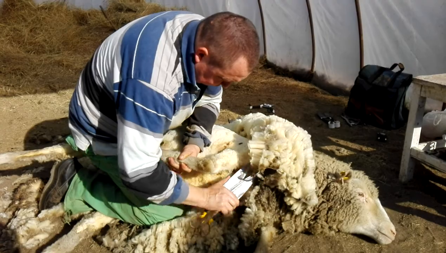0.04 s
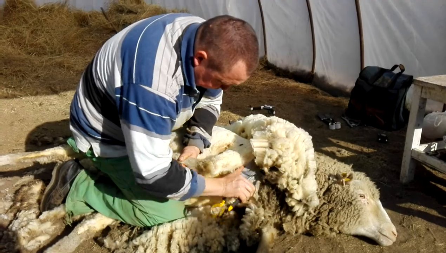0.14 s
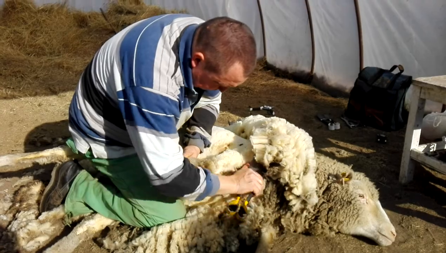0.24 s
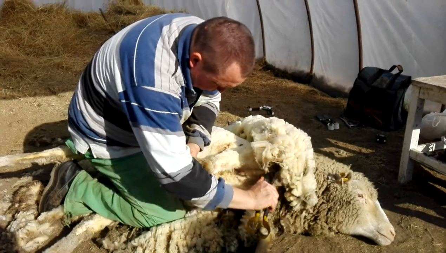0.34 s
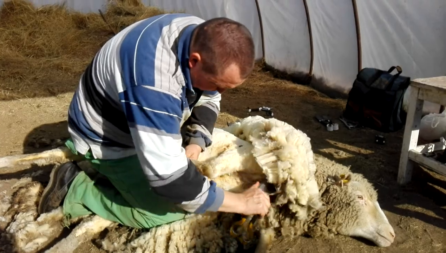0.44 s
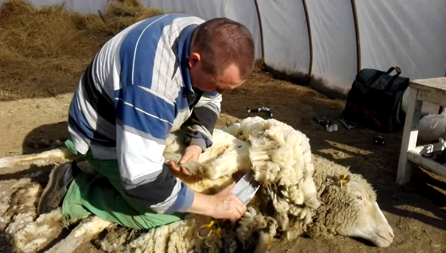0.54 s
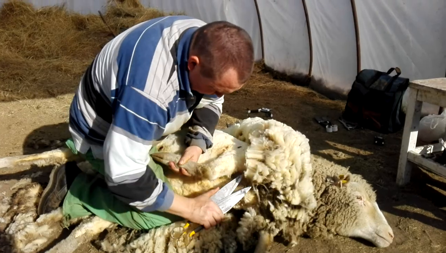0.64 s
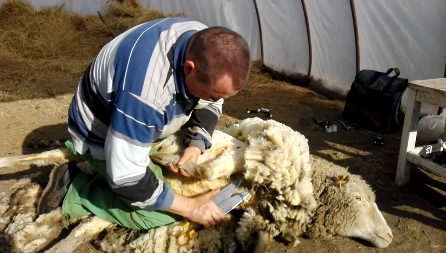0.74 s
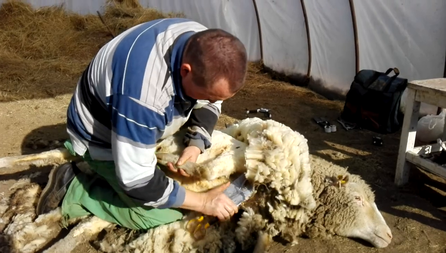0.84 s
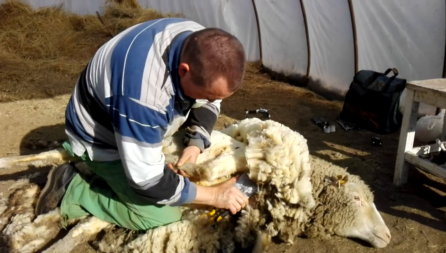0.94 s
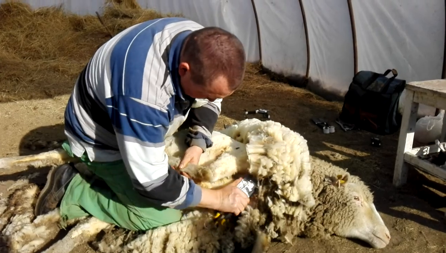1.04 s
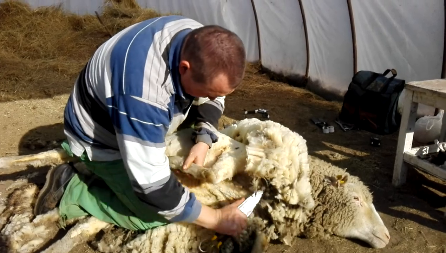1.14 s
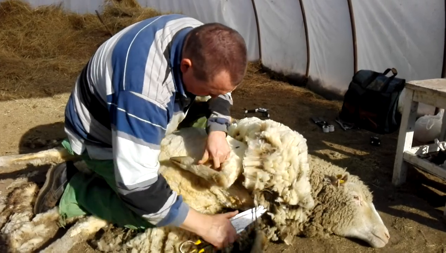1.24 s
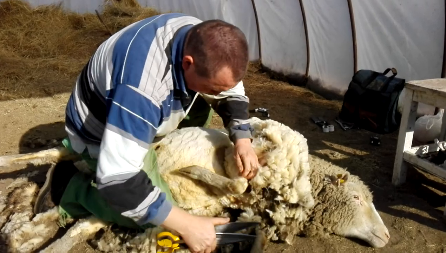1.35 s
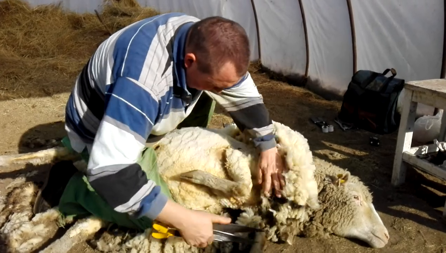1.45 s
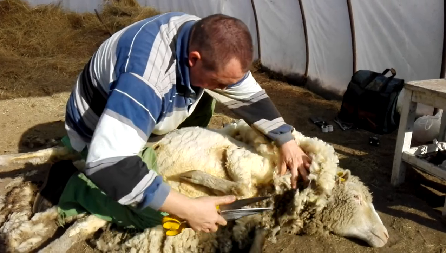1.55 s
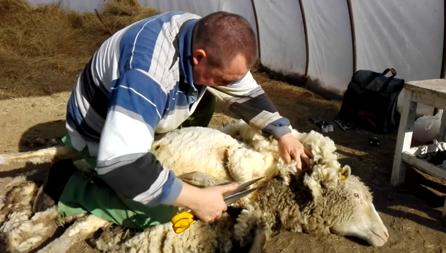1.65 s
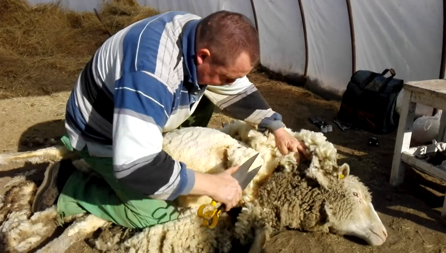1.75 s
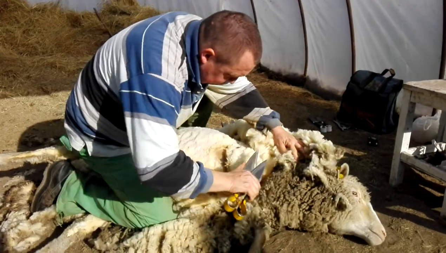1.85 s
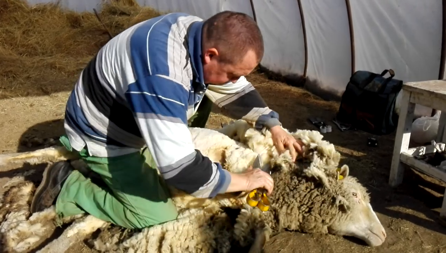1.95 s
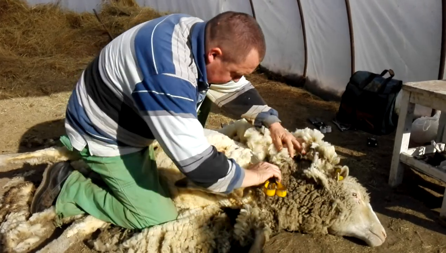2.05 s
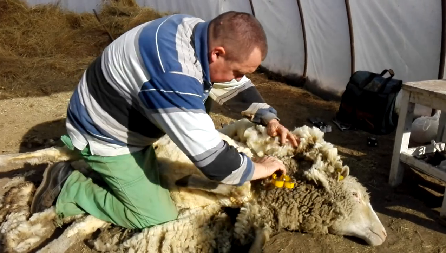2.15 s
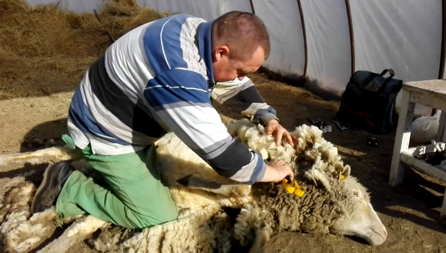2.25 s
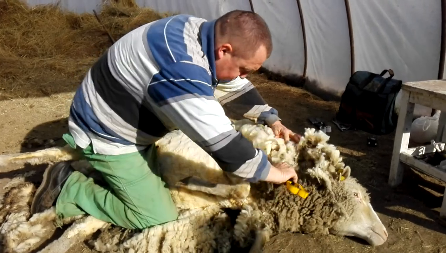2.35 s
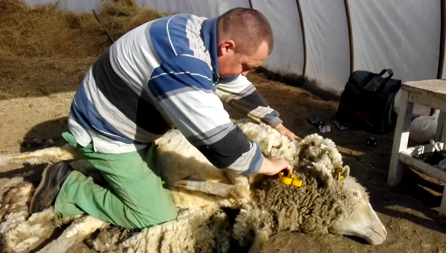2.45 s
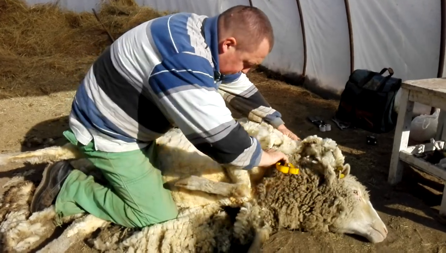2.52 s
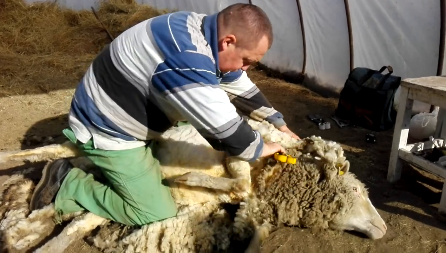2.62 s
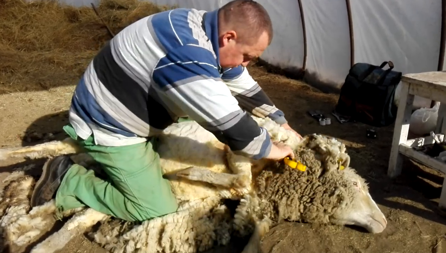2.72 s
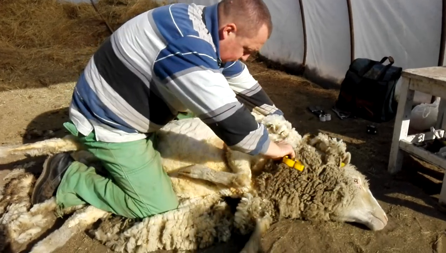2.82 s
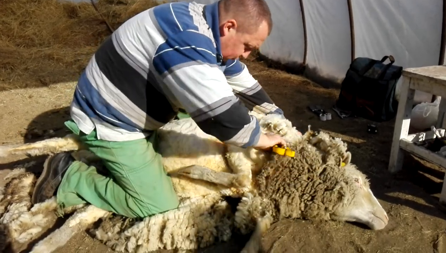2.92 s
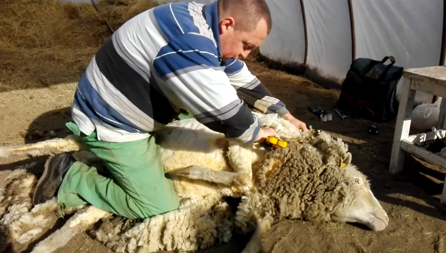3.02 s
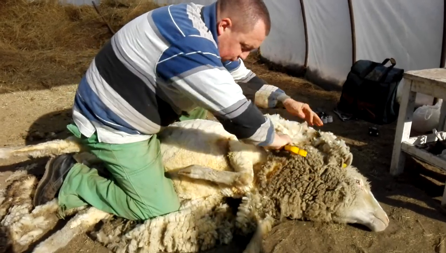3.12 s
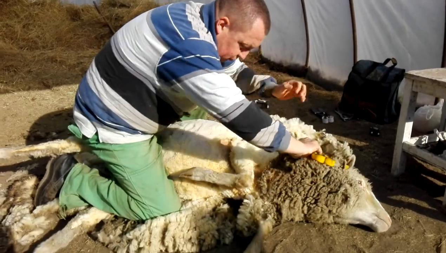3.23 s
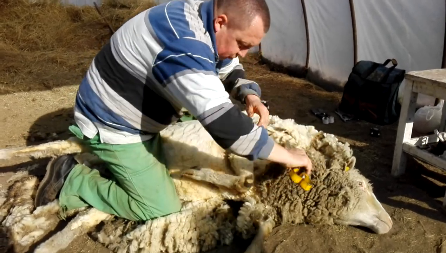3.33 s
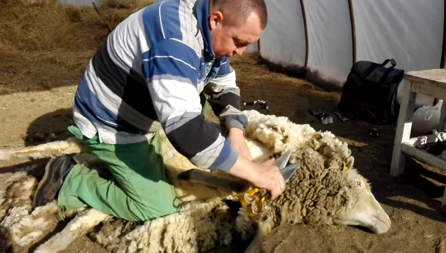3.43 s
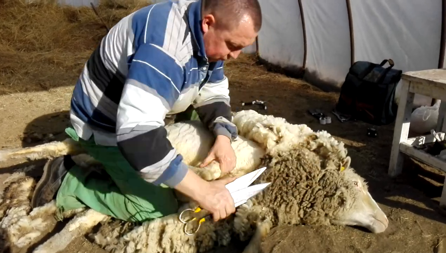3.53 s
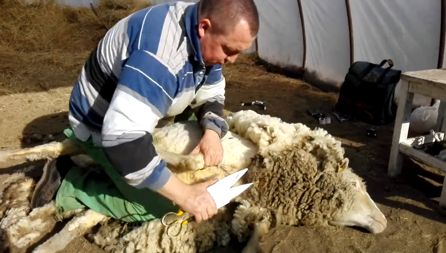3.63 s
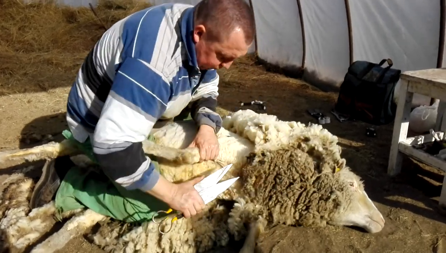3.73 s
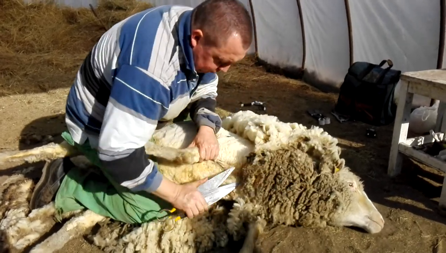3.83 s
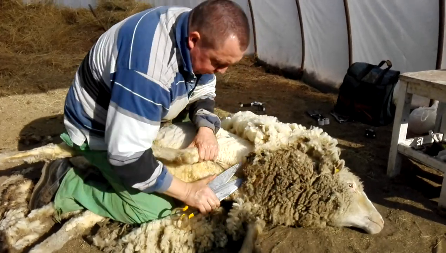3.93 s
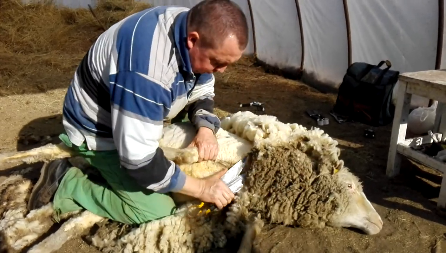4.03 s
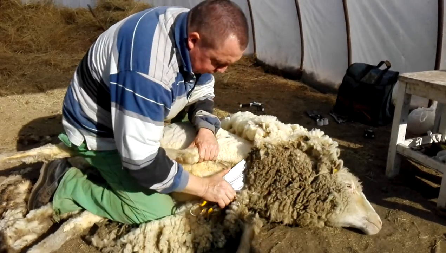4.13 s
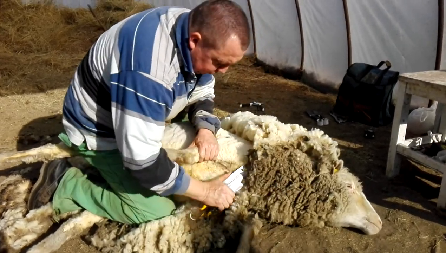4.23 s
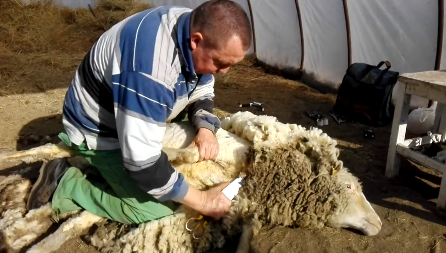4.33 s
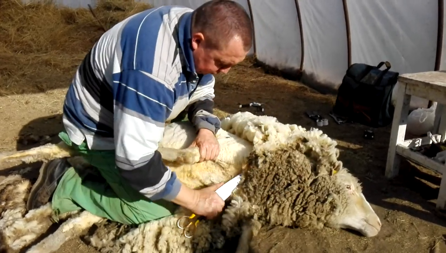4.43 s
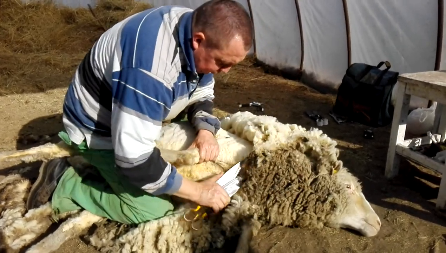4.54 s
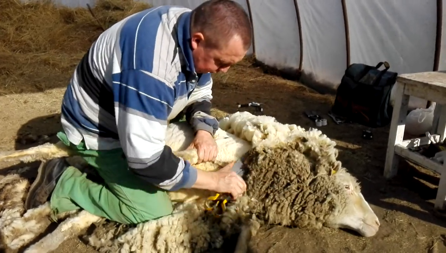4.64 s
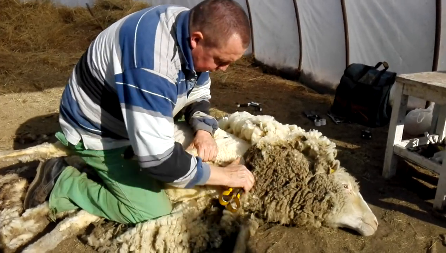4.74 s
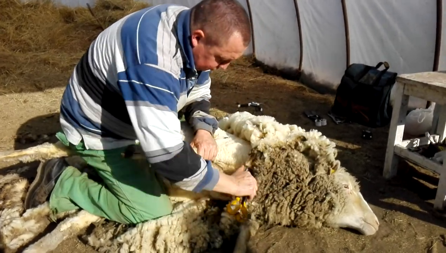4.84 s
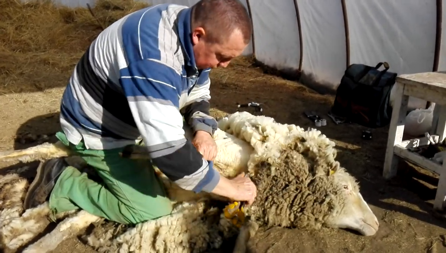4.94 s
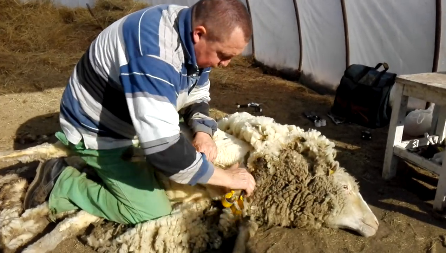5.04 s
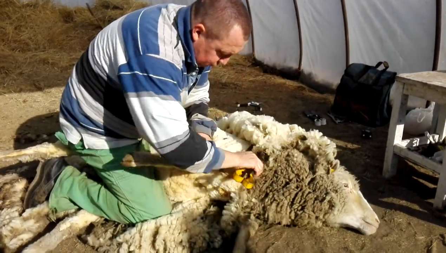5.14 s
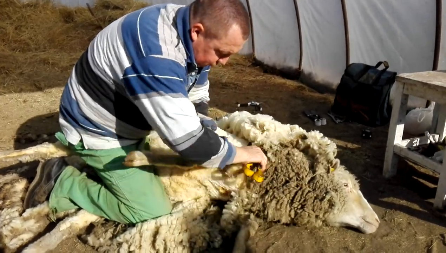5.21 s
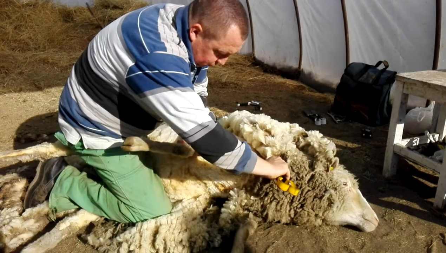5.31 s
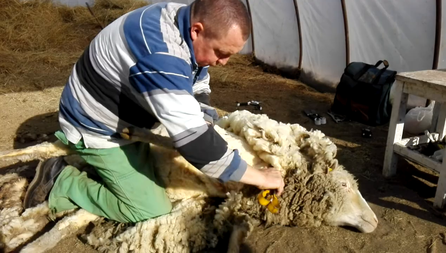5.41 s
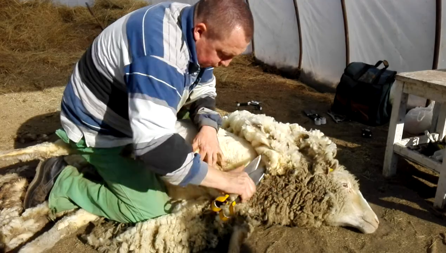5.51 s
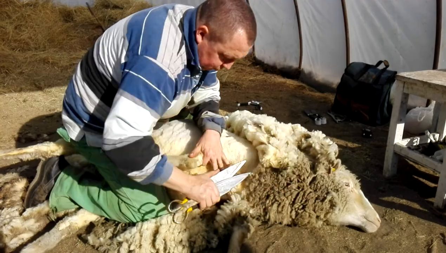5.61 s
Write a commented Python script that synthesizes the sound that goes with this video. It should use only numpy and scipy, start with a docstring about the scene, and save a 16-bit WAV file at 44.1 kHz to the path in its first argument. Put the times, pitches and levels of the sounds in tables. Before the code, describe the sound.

Sprung steel hand shears cut sheep's wool close to the microphone. Eight snips come in pairs and a run of three, each a crisp rasp swelling into a sharp double clack, then a scraping release. Soft swishes and thin squeaks fill the gaps, with faint fleece rustle. Wind rumbles low in short gusts, mostly in the first three seconds. Quiet outdoor hiss, with very faint reflections from a plastic shelter.

```python
"""Sprung hand shears snip eight times, close to the microphone, shearing a sheep in a plastic-covered shelter.
The blades rasp shut through the wool (shaped noise that also excites resonances), clack together
(noise bursts and decaying steel modes), rebound, and scrape open again.
Faint swishes and squeaks (noise in gliding resonances) and soft rustles of fleece and clothes join in.
Gusts rumble on the microphone as low noise and single pressure swings, over a quiet outdoor hiss."""
import sys
import numpy as np
from scipy import signal
from scipy.fft import rfft, irfft
from scipy.io import wavfile
from scipy.ndimage import uniform_filter1d

SR = 44100
rng = np.random.default_rng(int(sys.argv[2]) if len(sys.argv) > 2 else 0)


def pcm_store(signal):
    """Save signal as 16-bit PCM."""
    levels = np.round(np.clip(np.atleast_2d(signal), -1, 1) * 32767)
    wavfile.write(sys.argv[1], SR, levels.astype(np.int16).T)


N = 250047
TIME = np.arange(N) / SR  # seconds

# Pressure between the opening blades. Each row: start in seconds, length in seconds, level in dB.
OPENING_STROKES = [(0.0, 0.004, -41), (0.473, 0.048, -39.5), (1.267, 0.047, -36), (2.424, 0.026, -34.5),
                   (2.857, 0.0523, -37.5), (3.305, 0.04, -38.5), (4.518, 0.024, -35), (5.047, 0.027, -34),
                   (5.481, 0.037, -39)]
# Colour of the rasp. Each row: frequency in Hz, relative spectral density in dB per Hz.
RASP_SPECTRUM = [(400, -43), (1200, -38.5), (1700, -19), (2200, -23), (3300, -3.5), (4100, -5), (4600, 1),
                 (5900, -2), (7600, -9.5), (8500, -6), (9200, -14.5), (11300, -17.5), (13000, -13),
                 (14200, -12)]
# Resonances that the sliding edges excite. Each row: frequency in Hz, width in Hz, relative level in dB.
RASP_MODES = [(1800, 150, -20), (3368, 250, -9), (3740, 340, -2.5), (4600, 75, 0), (4870, 320, -2.5),
              (5680, 160, -1.5), (8530, 200, -5), (9900, 240, -12.5), (12930, 340, -8)]
# Squeaks and swishes between snips. Each row: start in seconds, length in seconds, level in dB,
# first frequency in Hz, last frequency in Hz, whistling share of the power from 0 to 1.
SWISH_EVENTS = [(0.0, 0.28, -65.5, 5010, 5250, 0.13), (1.701, 0.1, -66, 6453, 3900, 0.67),
                (1.808, 0.047, -61, 4400, 3600, 0.17), (1.858, 0.12, -74.5, 3493, 3440, 0.7),
                (1.967, 0.066, -54, 3980, 4650, 0.6), (2.04, 0.24, -62, 4720, 5470, .5),
                (2.48, 0.054, -66, 4480, 4150, .05), (2.95, 0.032, -57.5, 4342, 4800, .05),
                (3.07, 0.057, -61, 4840, 5360, 0.3), (4.017, 0.054, -61, 5550, 4530, 0.89),
                (4.083, 0.19, -66, 5100, 4450, .45), (4.602, .22, -69, 4400, 4900, 0.13)]
# Rustles of fleece and clothes. Each row: start in seconds, length in seconds, level in dB.
RUSTLE_EVENTS = [(0.0, 0.12, -77), (1.32, 0.14, -79.5), (3.884, .36, -73), (4.615, 0.074, -69.5)]
# Background of the outdoors. Each row: frequency in Hz, relative spectral density in dB per Hz.
AIR_SPECTRUM = [(12, -30.5), (20, 7), (103, -3), (302, -15.5), (421, -26.5), (656, -24.5), (1110, -17),
                (1310, -17.5), (1460, -19), (2930, -27), (4950, -23.5), (5380, -24), (6720, -29),
                (13400, -34), (15000, -39)]
AIR_DB = -67.5
# Rumble of wind. Each row: frequency in Hz, relative spectral density in dB per Hz.
WIND_SPECTRUM = [(8.8, -43.5), (15, -4), (44, 9.5), (138, -4.5), (159, -10), (204, -26.5), (261, -27),
                 (372, -48), (600, -59.5), (780, -86), (1320, -120)]
# Gusts, before the dulling of weak ones. Each row: start in seconds, length in seconds, level in dB.
GUST_EVENTS = [(0.0, 0.18, -49), (0.196, 0.08, -39.5), (0.316, 0.1, -45.5), (0.49, 0.086, -53.5),
               (0.66, .07, -50), (0.728, 0.049, -40.5), (0.829, 0.11, -40), (0.959, 0.19, -46.5),
               (1.303, 0.12, -43), (1.64, 0.034, -52.5), (1.734, 0.083, -52), (2.033, 0.09, -55),
               (2.387, 0.078, -54.5), (2.574, 0.22, -61), (2.933, 0.027, -48.5), (3.023, 0.088, -46)]
# Single buffets of wind. Each row: centre in seconds, sine level in dB before its bell window, pitch in Hz.
BUFFET_EVENTS = [(0.131, -32, 91), (0.254, -35.5, 146), (1.031, -32.5, 138)]
# The blades bite and slide shut until the next clack. Each row: start in seconds, final pressure in dB,
# swell on the way in dB, level of the squeal of the first light touch in dB.
CLOSING_STROKES = [(0.263, -37, 22.5, -63.5), (1.034, -37.5, 28.5, -68.5), (2.2, -39.5, 21.5, -63),
                   (2.679, -37, 32, -65.5), (3.166, -35.5, 3.5, -65), (4.267, -41.5, 8, -65.5),
                   (4.811, -36, 35.5, -55), (5.267, -39.5, 24.5, -59)]
BITE_S, SQUEEZE_EASE = 0.0087, 1.35  # time constant of the bite; the squeeze builds fast, then levels off
# Modes in which the edges squeal. Each row: frequency in Hz, width in Hz, relative level in dB.
TOUCH_MODES = [(2160, 97, -16), (5800, 70, 0), (8500, 70, 1)]
# The blades meet. Each row: time in seconds, level in dB, rebound in dB relative to the first contact,
# then the colour that grip and wool give the blow: low body, 1.6 kHz ping, 2.5 kHz clank,
# 7 kHz edge and top treble, all in dB.
CLACK_EVENTS = [(0.3524, -16.5, -3, 0, 6.5, 2.5, -2, 1), (1.1349, -11, -2, -1, -3.5, -3.5, 1.5, -1),
                (2.3164, -13.5, -6, -0.5, 6, 1.5, 4, 3), (2.7881, -16.0, -3, -2, 1, 2.5, 3.5, 0.5),
                (3.1856, -12.5, -1.5, -1, -8.5, 0, -0.5, -0.5), (4.3654, -11, -3.5, 4.5, -4.5, -5, 0, -0.5),
                (4.9255, -13.5, -1.5, -2.5, 2, -1.5, -2, 2), (5.3664, -15.0, -6.5, 2.5, 8.5, 9.5, 2.5, 2.5)]
# Colour of a clack. Each row: frequency in Hz, relative spectral density in dB per Hz.
CLACK_SPECTRUM = [(100, -40.5), (400, -36.5), (720, -30), (1000, -36), (1280, -23), (1550, -17.5),
                  (1850, -18), (2500, -5), (3900, -2.5), (4700, 3), (7000, -0.5), (9500, -3.5),
                  (10800, -15), (12500, -12), (13600, -7), (14200, -12)]
# Nominal modes of the steel blades. Each row: frequency in Hz, relative level in dB,
# 60 dB decay time in seconds before extra damping.
STEEL_MODES = [(770, -22, .06), (1320, -20, .05), (1612, -15, .17), (2622, -6, .08), (3250, -9, .07),
               (3390, -6, .1), (3710, -9, .06), (4475, 1, .16), (4610, -1, .07), (4740, 0, .08),
               (4830, -3, .11), (4945, -3, .07), (5305, 4, .08), (5570, 0, .07), (5930, -5, .06),
               (6470, -1, .06), (6735, -1, .06), (7572, -3, .05), (8640, -9, .08), (9380, -8, .05),
               (13110, -12, .04)]
# Long ring of the spring steel. Each row: frequency in Hz, level in dB, 60 dB decay time in seconds.
SPRING_MODES = [(2089, -72, 1.8), (3391, -65.5, 1.4), (4538, -65, .8), (4834, -59.5, .6)]
BOW_S = 4.366  # start of that ring
EDGE_HZ = 14350  # upper band limit


def gain_of(db):
    """The decibel law: a level in dB becomes an amplitude ratio."""
    return 10 ** (np.asarray(db) / 20)


def evened(x):
    """Normalisation of power: the signal is scaled to rms 1."""
    return x / np.sqrt(np.mean(x ** 2) + 1e-20)


def read(points, hz):
    """Interpolation of a spectrum table along a logarithmic frequency axis."""
    f, value = np.transpose(points)
    return np.interp(np.log(hz + 1), np.log(f + 1), value)


def add(mix, s, sound):
    """Superposition: mixes a sound in at time s."""
    part = mix[max(round(s * SR), 0):][:len(sound)]
    part += sound[:len(part)]


def colour(x, points, size=4096):
    """Minimum-phase filtering: a causal response is derived from the given spectrum."""
    hz = abs(np.fft.fftfreq(size, 1 / SR))
    log_gain = np.log(gain_of(read(points, hz)))
    response = np.exp(np.conj(signal.hilbert(log_gain)))
    taps = np.fft.ifft(response).real[:size // 2]
    return signal.oaconvolve(x, taps)[:len(x)]


def noise(points):
    """Spectral shaping: steady random noise of rms 1 takes the given spectrum."""
    hz = np.fft.rfftfreq(N, 1 / SR)
    spectrum = rfft(rng.standard_normal(N)) * gain_of(read(points, hz))
    return evened(irfft(spectrum, N))


def wander(hz):
    """Low-passed chance: random variation of rms 1, mostly slower than the given rate."""
    slowness = 1 / (1 + (np.fft.rfftfreq(N, 1 / SR) / hz) ** 4)
    return evened(irfft(rfft(rng.standard_normal(N)) * slowness, N))


def patchy(x, db, size=256):
    """Intermittent contact: level varies in brief random patches over time and frequency."""
    overlap = 3 * size // 4
    z = signal.stft(x, nperseg=size, noverlap=overlap)[2]
    patches = uniform_filter1d(rng.standard_normal(z.shape), size=5, axis=0)
    patches = uniform_filter1d(patches, size=5, axis=1)
    y = signal.istft(z * gain_of(db * evened(patches)), nperseg=size, noverlap=overlap)[1]
    return evened(y[:len(x)])


def envelope(t, length, attack_s, sag_db_per_s, release_db_per_s):
    """Exponential decay in two stages: it rises from t = 0, sags while the push lasts, then dies away."""
    sag_db = sag_db_per_s * np.clip(t, 0, length)
    release_db = release_db_per_s * np.maximum(t - length, 0)
    return np.clip(t / attack_s, 0, 1) * gain_of(-np.minimum(sag_db + release_db, 200))


def resonate(x, hz, width):
    """Heterodyne resonance: a steep low-pass in a turning frame follows the frequency curve hz."""
    turn = np.exp(2j * np.pi * np.cumsum(hz) / SR)
    r = np.exp(-np.pi * abs(width) / SR)
    smoothed = signal.lfilter([(1 - r) ** 2], [1, -2 * r, r * r], x / turn)
    return evened((turn * smoothed).real)


def releases():
    """Elastic unloading: pressure between the opening blades starts suddenly and eases with the spring."""
    for start, length, db in OPENING_STROKES:
        push = envelope(TIME - start, length, attack_s=0.0069, sag_db_per_s=149.5, release_db_per_s=440)
        yield start, start + length, gain_of(db) * push


def rasp(strokes, db, grain_db, slip_db, patch_db, edge_db, low_db, top_db, smear_t60=0.046, smear_db=1):
    """Stick-slip friction: edges scrape in uneven slips; light touch sings in resonances, hard touch grinds."""
    out, t = np.zeros(N), np.arange(SR // 16) / SR
    pressure = sum(push for _, _, push in strokes)
    unevenness = gain_of(grain_db * wander(1200) + slip_db * wander(80))
    grains = patchy(rng.standard_normal(N) * unevenness, patch_db)
    scrape = evened(colour(grains, RASP_SPECTRUM))
    edges = np.zeros(N)
    for hz, width, d in RASP_MODES:
        edges += gain_of(d) * evened(signal.lfilter(*signal.iirpeak(hz, hz / width, SR), grains))
    # the singing share shrinks as pressure grows
    singing = np.minimum(gain_of(edge_db) * (gain_of(-48.5) / (pressure + 1e-6)) ** .5, 1)
    sound = pressure * (np.sqrt(1 - singing ** 2) * scrape + singing * evened(edges))
    # each stroke meets the steel at another spot, and rings in other close modes
    for start, end, _ in strokes:
        start, end = max(start - .05, 0), end + .12
        steel = rng.standard_normal(len(t)) * gain_of(-60 * t / smear_t60)
        steel *= gain_of(smear_db) / np.linalg.norm(steel)
        steel[0] += 1  # the direct sound
        stroke = sound[round(start * SR):round(end * SR)]
        add(out, start, signal.oaconvolve(stroke, steel / np.linalg.norm(steel)))
    return gain_of(db) * colour(out, [(1100, 0), (1750, low_db), (2600, 0), (5000, 0), (12000, top_db)])


def swish(line_width_hz=110, wide_width_hz=1900, flutter_db=1.0, strand_step=.11, strand_db=-9, break_db=3):
    """Gliding resonance: soft hisses move in pitch, some narrowed to a few thin, broken whistles."""
    out, t = np.zeros(N), np.arange(SR // 2) / SR
    wobble = 1 + .016 * wander(35)
    strands = [(1, 0), (1 + strand_step, strand_db), (1 - strand_step, strand_db)]  # pitch ratio, dB
    for s, length, level_db, first_hz, last_hz, share in SWISH_EVENTS:
        glide = np.interp(t, [0, length], [first_hz, last_hz])
        centre = glide * wobble[round(s * SR):][:len(t)]
        hiss = resonate(rng.standard_normal(len(t)), centre, wide_width_hz)
        hiss = colour(hiss, [(2000, -22), (3000, -3.0), (5300, -8.5), (6300, -16), (8000, -11)])
        hiss = patchy(hiss, db=2.5)
        line = np.zeros(len(t))
        for ratio, d in strands:
            line += gain_of(d) * resonate(rng.standard_normal(len(t)), centre * ratio, line_width_hz)
        line = patchy(line, break_db)
        push = envelope(t, length, attack_s=.018, sag_db_per_s=25, release_db_per_s=352)
        add(out, s, gain_of(level_db) * push * (np.sqrt(1 - share) * hiss + np.sqrt(share) * line))
    return out * gain_of(flutter_db * wander(67))


def rustle(crumple_db=3):
    """Soft friction: fleece and cloth rub dully and unevenly, as patchy shaped noise."""
    rubbing = noise([(100, -0.5), (250, 1), (700, 2.0), (1100, -1.5), (1600, 2), (2200, 3),
                     (3500, -13.5), (7000, -21.5)])
    motion = np.zeros(N)
    for s, length, d in RUSTLE_EVENTS:
        motion += gain_of(d) * envelope(TIME - s, length, attack_s=.06, sag_db_per_s=6.5, release_db_per_s=111)
    return motion * gain_of(crumple_db * wander(40)) * patchy(rubbing, db=2.0)


def air(swell_db=1):
    """Ambient noise: the quiet outdoors is shaped noise with a slight random swell."""
    return gain_of(AIR_DB + swell_db * wander(9)) * noise(AIR_SPECTRUM)


def wind(buffet_cycles=0.35, calm_hz=100, full_db=-42):
    """Turbulent pressure: eddies rumble, duller in weak gusts; the sharpest are single pressure swings."""
    rumble = noise(WIND_SPECTRUM)
    rumble /= np.sqrt(uniform_filter1d(rumble ** 2, size=4096))  # steadies the local level
    dull = signal.sosfiltfilt(signal.butter(2, calm_hz, fs=SR, output="sos"), rumble)
    power = np.zeros(N)
    for s, length, d in GUST_EVENTS:
        push = envelope(TIME - s, length, attack_s=0.02, sag_db_per_s=21.5, release_db_per_s=219)
        power += (gain_of(d) * push) ** 2
    force = np.sqrt(power)
    brightness = np.minimum(force / gain_of(full_db), 1)
    out = force * (dull + brightness * (rumble - dull))
    for s, level_db, hz in BUFFET_EVENTS:
        turns = (TIME - s) * hz
        out -= gain_of(level_db) * np.sin(2 * np.pi * turns) * np.exp(-(turns / buffet_cycles) ** 2)
    return out


def squeezes():
    """Growing contact force: pressure between the closing blades builds from the first bite to the clack."""
    for (start, db, swell_db, _), (shut, *_) in zip(CLOSING_STROKES, CLACK_EVENTS):
        to_go = np.clip((shut - TIME) / (shut - start), 0, 1)
        bite = np.exp(np.clip((TIME - start) / BITE_S, -30, 0))
        yield start, shut, bite * (TIME < shut) * gain_of(db - swell_db * to_go ** SQUEEZE_EASE)


def squeal(hold_s=.06):
    """Friction-excited modes: while the edges still touch lightly, they sing in a few narrow bands."""
    out, t = np.zeros(N), np.arange(SR // 4) / SR
    for start, _, _, level_db in CLOSING_STROKES:
        tone = np.zeros(len(t))
        for hz, width, d in TOUCH_MODES:
            tone += gain_of(d) * resonate(rng.standard_normal(len(t)), np.full(len(t), hz), width)
        touch = envelope(t, hold_s, attack_s=.008, sag_db_per_s=15, release_db_per_s=300)
        add(out, start, evened(tone) * gain_of(level_db) * touch)
    return out


def blades(spread_db, detune, damping):
    """Modal ringing of energy 1: grip and wool change the blades' modes a little each time."""
    t = np.arange(SR // 4) / SR
    ring = np.zeros(len(t))
    for hz, db, t60 in STEEL_MODES:
        level_chance, pitch_chance, phase_chance = rng.standard_normal(3)
        decay = gain_of(db + spread_db * level_chance - 60 * damping * t / t60)
        ring += decay * np.sin(2 * np.pi * (hz * (1 + detune * pitch_chance) * t + phase_chance))
    return ring / np.linalg.norm(ring)


def clack(db, rebound_db, body, ping, clank, edge, top, bounce_s=.0063, chatter_t60=0.024, third_db=-14,
          ring_db=-6, tail_db=-13.0, tail_t60=0.18, bright_t60=0.155):
    """Repeated impact: the blades slam shut and bounce twice, each contact a brief chatter of steel."""
    t = np.arange(SR // 4) / SR
    gap = bounce_s * rng.uniform(.96, 1.1)
    blows = [(0, 0), (gap, rebound_db), (gap * rng.uniform(1.8, 2.1), third_db)]  # seconds, dB
    # each contact builds, holds briefly and dies
    power = np.zeros(len(t))
    for s, d in blows:
        build = np.clip((t - s) / 0.0003, 0, 1)
        decay = gain_of(d - 60 * np.maximum(t - s - .0012, 0) / chatter_t60)
        power += (build * decay) ** 2
    crack = evened(colour(rng.standard_normal(len(t)) * np.sqrt(power), CLACK_SPECTRUM))
    # countless weak modes of blades and bow linger as a haze, the highest dying first
    haze = colour(patchy(rng.standard_normal(len(t)), db=5.0), CLACK_SPECTRUM)
    dark = signal.sosfiltfilt(signal.butter(4, 6500, fs=SR, output="sos"), haze)
    bright = haze - dark
    haze = evened(dark * gain_of(-60 * t / tail_t60) + bright * gain_of(-60 * t / bright_t60))
    ring = np.zeros(len(t))
    for s, d in blows:
        add(ring, s, gain_of(d) * blades(spread_db=3.5, detune=0.0013, damping=1.5))
    grip = [(900, body), (1450, ping), (1800, ping), (2200, clank), (2900, clank), (3600, 0), (5300, 0),
            (6500, edge), (9000, edge), (11000, top)]
    sound = colour(crack + gain_of(tail_db) * haze + gain_of(ring_db) * evened(ring), grip)
    return gain_of(db) * sound / np.sqrt(np.mean(sound[:SR // 100] ** 2))  # level over the first 10 ms


def clacks():
    """A series of impacts: every closing of the shears at its own time."""
    out = np.zeros(N)
    for s, *blow in CLACK_EVENTS:
        add(out, s, clack(*blow))
    return out


def bow():
    """Weakly damped modes: the faint, long ring of the spring steel as decaying sines."""
    out, t = np.zeros(N), np.arange(SR) / SR
    for hz, db, t60 in SPRING_MODES:
        add(out, BOW_S, gain_of(db - 60 * t / t60) * np.sin(2 * np.pi * hz * t))
    return out


def shelter(x, wet_db=-24, t60=0.27):
    """Diffuse reverberation: decaying noise taps give faint, short reflections from the plastic walls."""
    t = np.arange(SR // 2) / SR
    taps = rng.standard_normal(len(t)) * (t > .012) * gain_of(-60 * t / t60)
    taps = colour(taps / np.linalg.norm(taps), [(300, 16.0), (5500, -10), (12000, -16.5)])
    return x + gain_of(wet_db) * signal.oaconvolve(x, taps)[:N]


def stereo_width(x, side_db=-4, t60=.09):
    """Stereo width: short decaying noise taps add a treble side signal, opposite in the two channels."""
    t = np.arange(SR // 8) / SR
    taps = rng.standard_normal(len(t)) * (t > .004) * gain_of(-60 * t / t60)
    taps = colour(taps / np.linalg.norm(taps), [(2400, -42), (4400, -39.5), (8000, -16), (14000, -12.5)])
    side = signal.oaconvolve(x, taps)[:N]
    return x + gain_of(side_db) * np.array([side, -side])


def scene():
    """Superposition of sources: shears, swish, rustle and air are widened; wind is equal in both channels."""
    grit = dict(grain_db=5.5, slip_db=2.0, patch_db=4.0)
    opening = rasp(list(releases()), db=-1.5, edge_db=-4.5, low_db=0.5, top_db=-5, **grit)
    closing = rasp(list(squeezes()), db=-1.5, edge_db=-6.5, low_db=0.5, top_db=2, **grit)
    shears = shelter(opening + closing + squeal() + clacks())
    return stereo_width(shears + swish() + rustle() + air() + bow()) + wind()


def record(dry, ceiling=4.1):
    """Soft saturation and band limitation: high peaks are slightly rounded, then the top treble is cut."""
    limited = ceiling * np.tanh(dry / ceiling)
    low_pass = signal.firwin(301, EDGE_HZ, window=("kaiser", 7), fs=SR)
    return signal.oaconvolve(limited, low_pass[None], "same", axes=1)


dry = scene()
out = record(dry)
pcm_store(out)
```